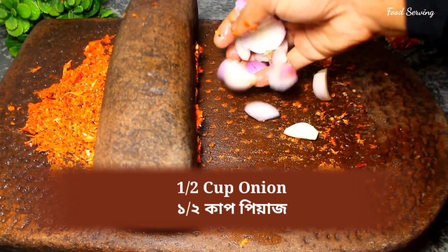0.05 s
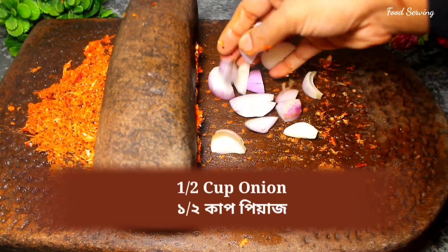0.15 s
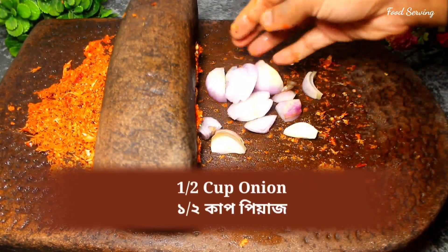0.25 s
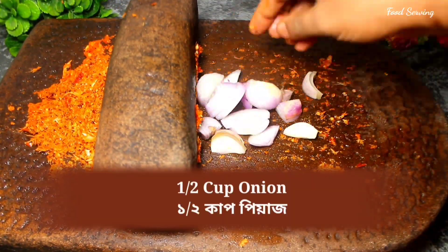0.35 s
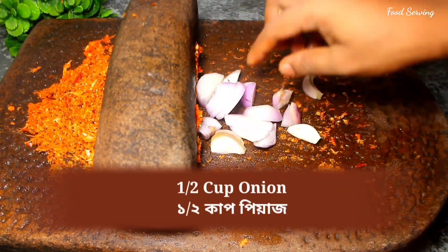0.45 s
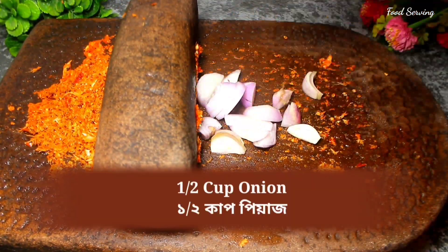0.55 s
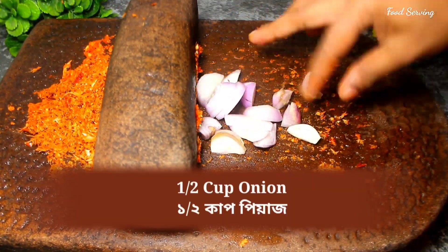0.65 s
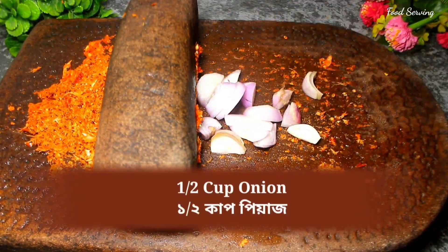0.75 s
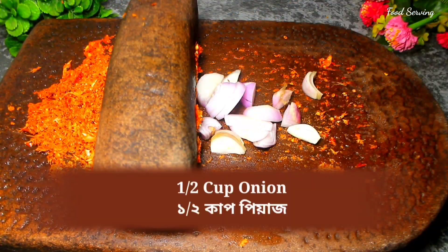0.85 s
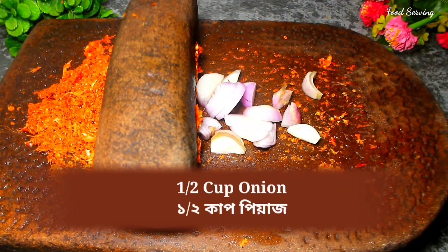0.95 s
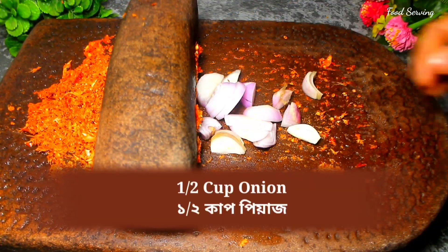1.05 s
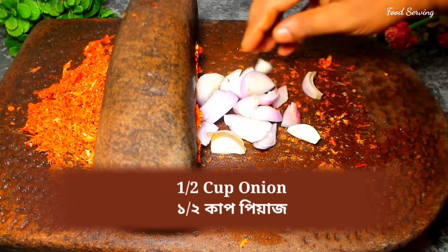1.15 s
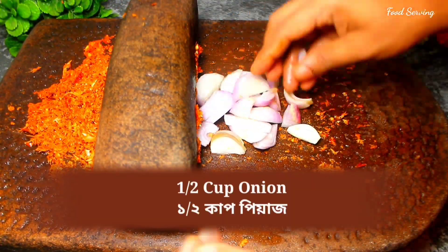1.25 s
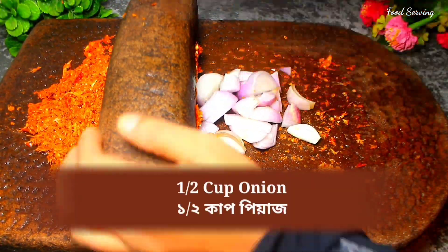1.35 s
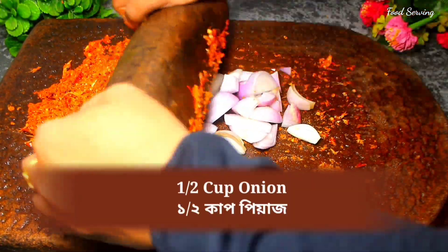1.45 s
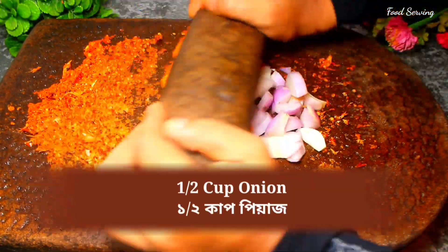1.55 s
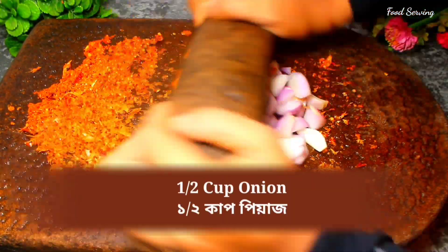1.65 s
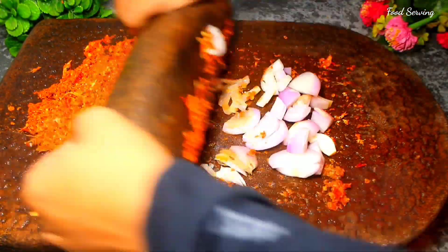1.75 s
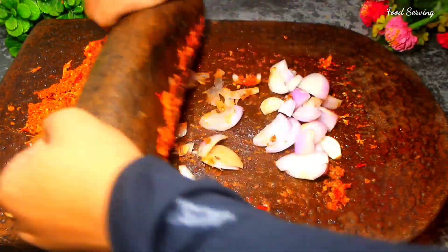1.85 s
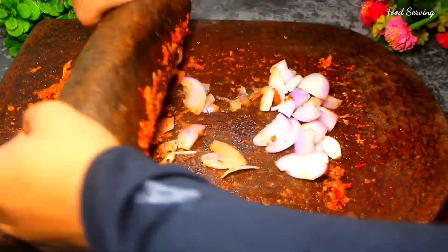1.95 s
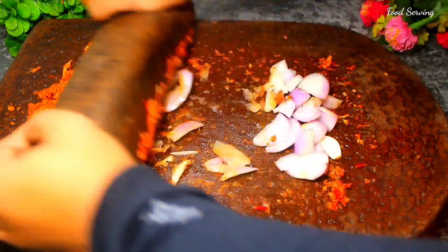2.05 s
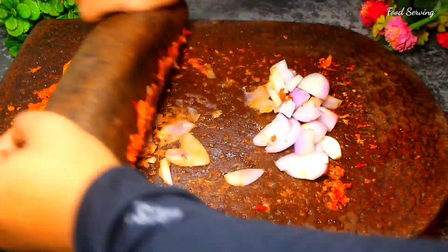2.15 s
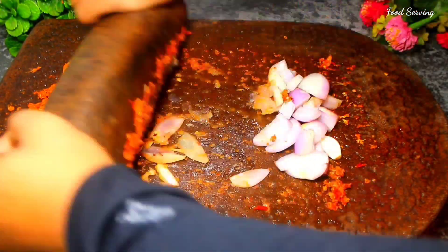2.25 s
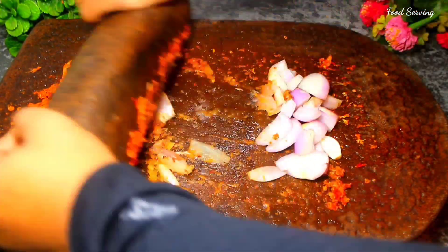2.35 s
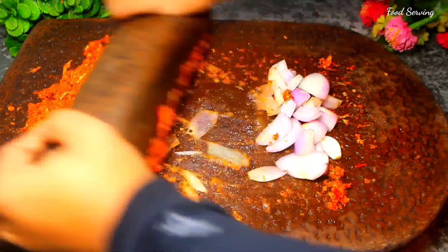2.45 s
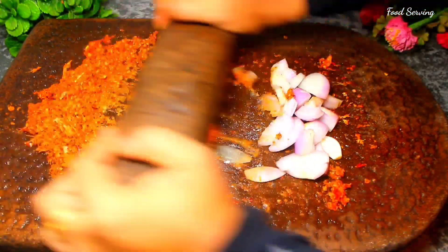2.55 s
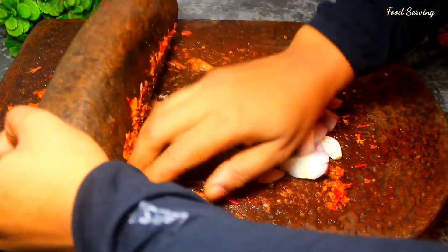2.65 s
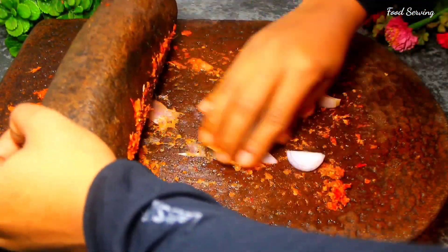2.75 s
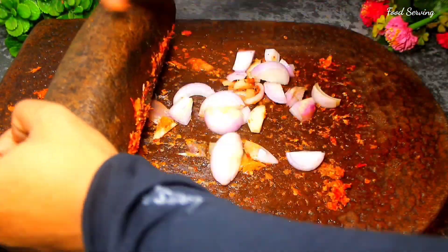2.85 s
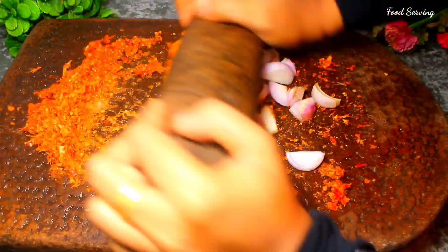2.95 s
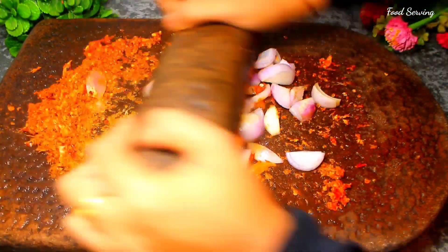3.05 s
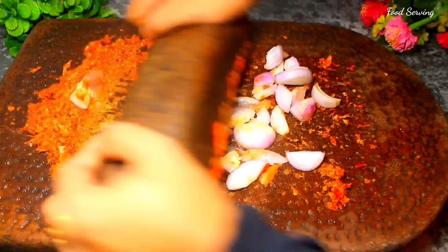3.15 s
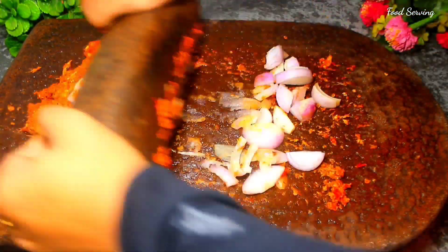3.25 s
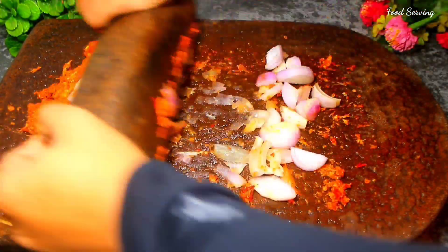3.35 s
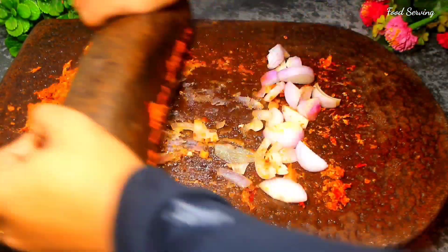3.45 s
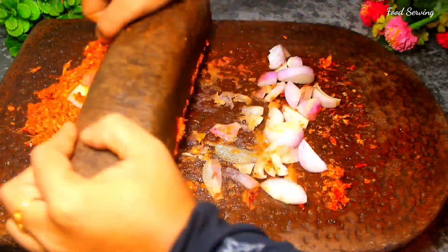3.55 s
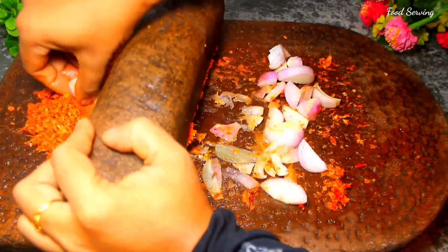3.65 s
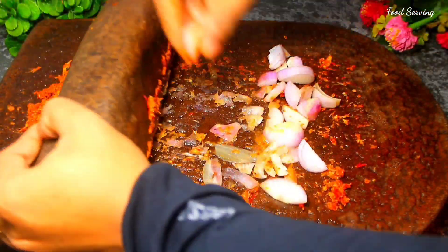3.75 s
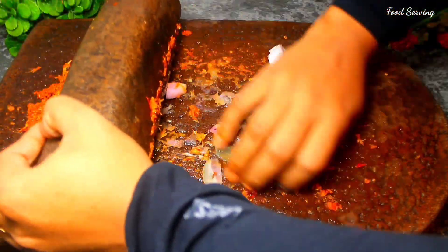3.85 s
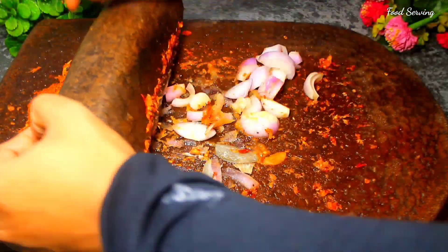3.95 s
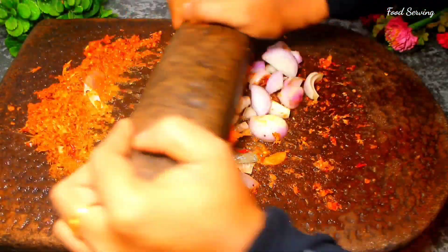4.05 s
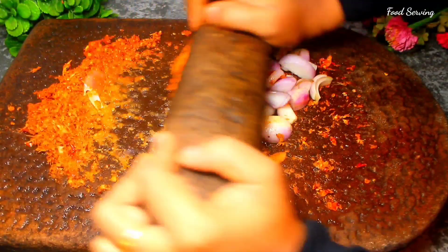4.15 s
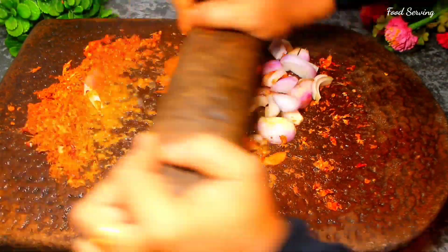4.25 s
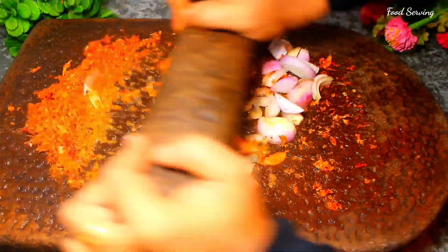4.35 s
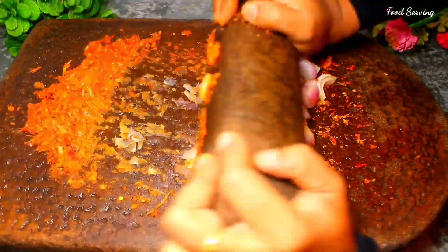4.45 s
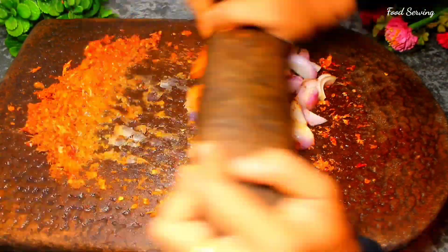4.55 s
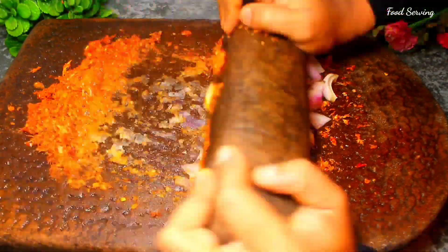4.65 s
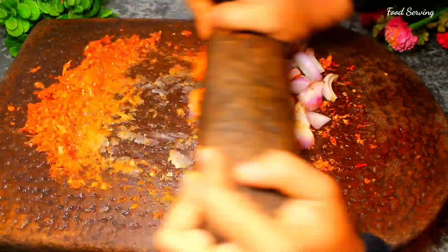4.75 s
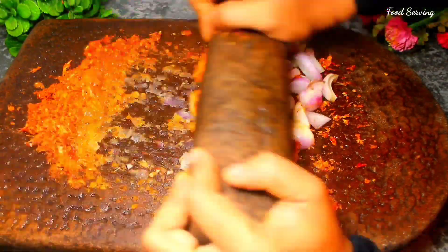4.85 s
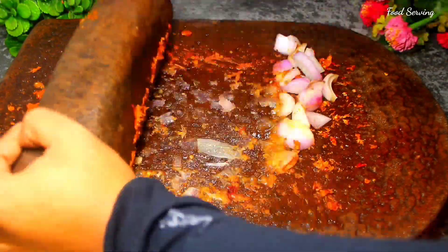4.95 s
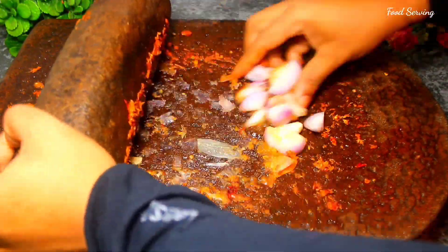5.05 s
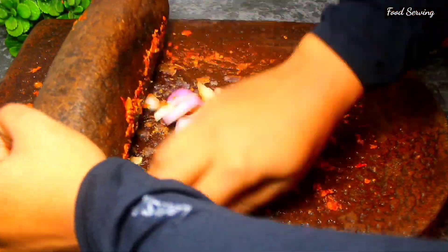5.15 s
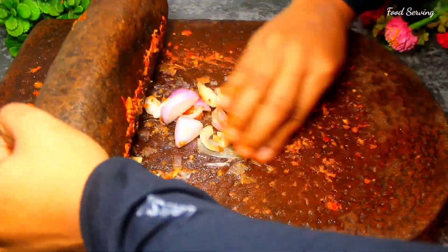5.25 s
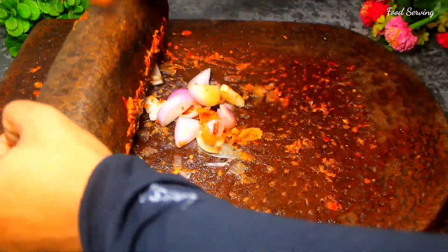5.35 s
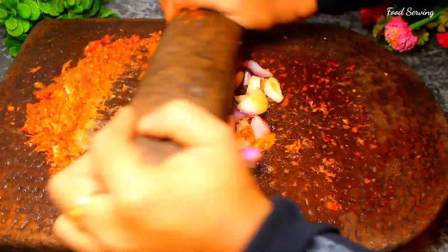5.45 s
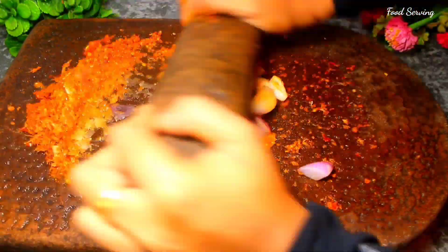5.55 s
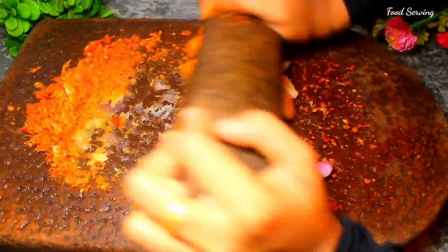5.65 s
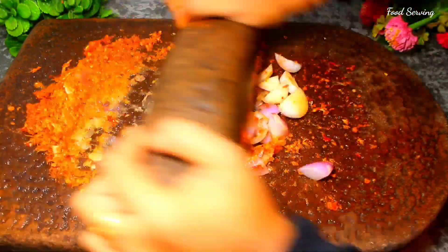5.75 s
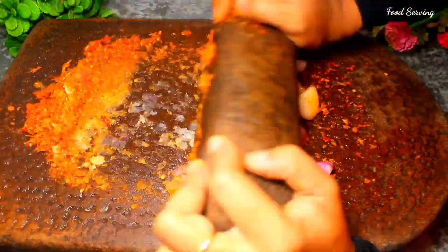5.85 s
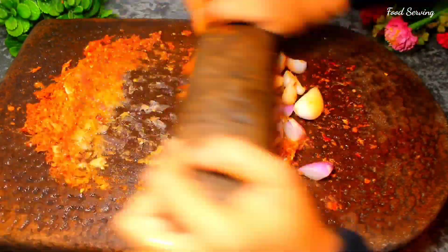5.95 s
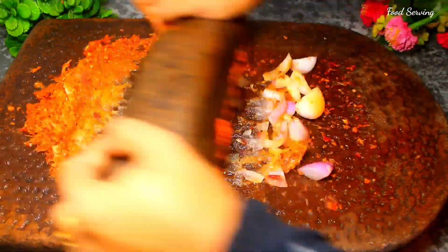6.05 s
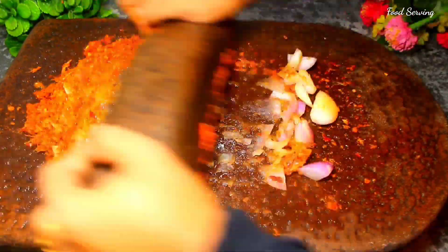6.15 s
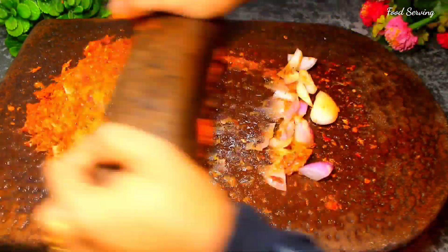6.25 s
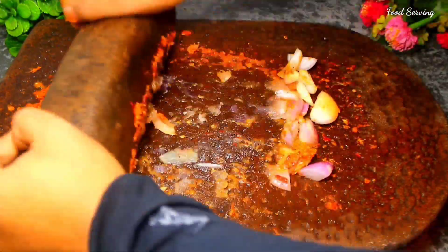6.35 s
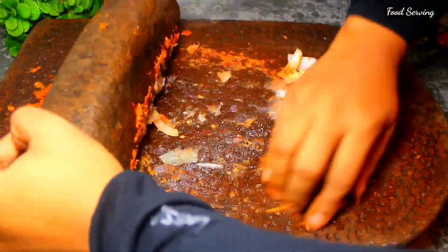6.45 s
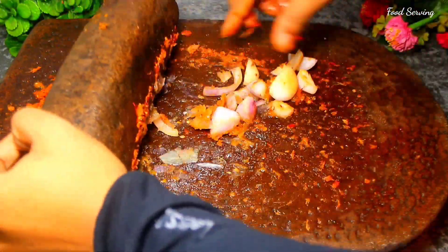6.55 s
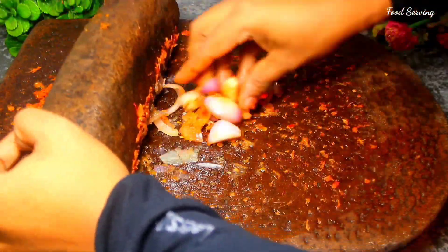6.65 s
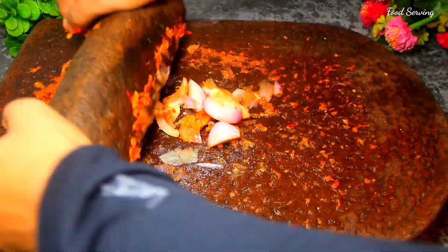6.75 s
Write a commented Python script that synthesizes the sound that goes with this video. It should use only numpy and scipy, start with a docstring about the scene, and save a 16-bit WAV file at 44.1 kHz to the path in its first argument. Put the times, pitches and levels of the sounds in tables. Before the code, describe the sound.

For the first 1.5 seconds it is quiet: faint drifting air and a weak low motor hum, soft finger rustles, tiny wet ticks, a small stone tap at 0.2 and faint breathy high chirps near 0.1 and 0.75. At about 1.56 a stone roller starts with irregular knocks and bright onion cracks, a solid clack near 1.93, then settles into rapid gritty to-and-fro scraping with low crunches until 2.7. A pause brings a rustle and wet ticks. Grinding resumes from 3.03 to 3.7, with a very hard clack at 3.09. After a quiet gap, a steadier bout runs 4.1 to 5.08 with crisp snaps. Fingers rustle softly, then the last bout, 5.5 to 6.5, opens with loud knocks at 5.54, 5.7 and 5.8 and has faint thin squeals around 6.2. It ends in a rustle and quiet air. Close, lightly roomy, little bass.

```python
"""A room with a stone slab, on which a stone roller is rubbed fast to and fro, crushing onion into spice paste in four bouts.
Grit pulses, louder with stroke speed, hiss and ring the stone modes; blows ring them too, as the roller knocks on the slab.
Onion pieces crack and lumps crunch as short bursts of ring and noise; wet ticks and rustling fingers fill the pauses.
Drifting air noise, motor hum tones, high noise-band chirps and faint wavering squeals complete it.
One close microphone flattens the hardest knocks."""
import sys
import numpy as np
from scipy import signal
from scipy.fft import rfft, irfft
from scipy.io import wavfile
from scipy.ndimage import uniform_filter1d

SR = 44100
rng = np.random.default_rng(int(sys.argv[2]) if len(sys.argv) > 2 else 0)


def master(y):
    """Save y as 16-bit WAV."""
    cut = np.clip(np.atleast_2d(y).T, -1, 1)
    pcm = np.round(cut * 32767)  # scale
    wavfile.write(sys.argv[1], SR, pcm.astype(np.int16))


N = 299880


def undb(db):
    """Amplitude of a level in dB."""
    return 10 ** (np.asarray(db) / 20)


def unit(x):
    """Scale to rms 1."""
    return x / np.sqrt(np.mean(x ** 2))


def log_bins():
    """Log frequency of each FFT bin; 1 Hz added to keep the log finite."""
    return np.log(np.arange(N // 2 + 1) * SR / N + 1)


def colour(x, points):
    """Shape by a (f/Hz, gain/dB) spectrum; rms 1."""
    hz, db = np.transpose(points)
    gain = undb(np.interp(log_bins(), np.log(hz), db))
    return unit(irfft(rfft(x) * gain, N))


def walk(rate_hz):
    """Random levels held 1 / rate_hz s and slewed twice; spread near 1."""
    k = int(SR / rate_hz)
    held = np.repeat(rng.standard_normal(N // k + 1), k)
    return 1.6 * uniform_filter1d(uniform_filter1d(held, k), k)[:N]


def patchy(x, centres_hz, rate_hz, depth_db):
    """Each band swells and fades alone; rms 1."""
    f, spectrum = log_bins(), rfft(x)
    out = np.zeros(N)
    for row in np.eye(len(centres_hz)):
        share = np.interp(f, np.log(centres_hz), row)
        out += irfft(spectrum * share, N) * undb(depth_db * walk(rate_hz))
    return unit(out)


def thin(x, hz):
    """High-pass: a small body radiates little below this frequency."""
    return signal.sosfilt(signal.butter(2, hz, "high", fs=SR, output="sos"), x)


def mode(x, hz, t60_s):
    """One ringing mode; a unit pulse rings with peak near 1."""
    pole = np.exp(2j * np.pi * hz / SR - np.log(1000) / (t60_s * SR))
    return signal.lfilter([1], [1, -pole], x).imag


def grit(rate_hz, spread_db, patchy_db):
    """Grains that catch and let go: random pulses of very uneven size, in patches, over fine dust."""
    caught = rng.random(N) < rate_hz / SR
    size = undb(spread_db * np.minimum(rng.exponential(size=N), 3.0))
    grains = caught * size * rng.standard_normal(N)
    dust = 0.37 * rng.standard_normal(N)
    return unit((grains + dust) * undb(patchy_db * walk(250)))


# room air spectrum: f/Hz, relative level/dB
AIR_SPECTRUM = [(20, -40), (60, -24.5), (145, -25), (175, -17), (230, -22.5), (420, -15.5), (1190, -13.5),
                (1760, -18.5), (2120, -17.5), (4000, -22.5), (7470, -27.5), (14000, -28), (16000, -31.5)]
AIR_RMS_DB = -61
AIR_DIP_S, AIR_DIP_FALL_S, AIR_DIP_RISE_S, AIR_DIP_DB = .98, .08, .05, -6


def room_air():
    """Noise whose bands drift; the level dips briefly."""
    t = np.arange(N) / SR
    air = patchy(colour(rng.standard_normal(N), AIR_SPECTRUM), [100, 400, 1200, 2500, 6000, 12000], 16, 1.0)
    dip_at_s = [AIR_DIP_S - AIR_DIP_FALL_S, AIR_DIP_S, AIR_DIP_S + AIR_DIP_RISE_S]
    return air * undb(AIR_RMS_DB + np.interp(t, dip_at_s, [0, AIR_DIP_DB, 0]))


# motor tones, the two upper ones beating: f/Hz, rms level before the wander/dB
MOTOR_TONES = [(178.2, -86), (350.33, -75), (356.45, -66)]
HUM_CREST_S = .05  # all tones crest together here


def motor_hum():
    """Steady tones under one wandering level."""
    t = np.arange(N) / SR
    hum = np.zeros(N)
    for hz, rms_db in MOTOR_TONES:
        hum += np.sqrt(2) * undb(rms_db) * np.cos(2 * np.pi * hz * (t - HUM_CREST_S))
    return hum * undb(1.4 * walk(8))


# high chirps: start t/s, length/s, f/Hz, upper band's level before the fade/dB
CHIRP_EVENTS = [(0.086, 0.13, 12000, -59), (0.752, 0.075, 12200, -51.5), (5.38, .05, 11500, -56)]
CHIRP_ATTACK_S, CHIRP_FADE_DB, CHIRP_HALF_PITCH_DB = .01, -24, -12
CHIRP_T60_S = .004  # short ring: a band some hundred Hz wide


def chirps():
    """Rough, breathy noise bands with a weak band an octave below: quick onset, steady fade."""
    out, t = np.zeros(N), np.arange(N) / SR
    noise = rng.standard_normal(N)

    def band(hz):
        """Noise through two equal modes; rms 1."""
        return unit(mode(mode(noise, hz, CHIRP_T60_S), hz, CHIRP_T60_S))

    for s, length_s, hz, db in CHIRP_EVENTS:
        fade_db = CHIRP_FADE_DB * np.clip((t - s) / length_s, 0, 1)
        gain = np.clip((t - s) / CHIRP_ATTACK_S, 0, 1) * (t < s + length_s) * undb(db + fade_db)
        out += gain * (band(hz) + undb(CHIRP_HALF_PITCH_DB) * band(hz / 2))
    return out


# fingers among the pieces: start t/s, length/s, level at mid-swell/dB
RUSTLE_EVENTS = [(.17, 0.13, -64), (.46, .22, -61), (0.744, 0.083, -67), (1.2, 0.27, -68.5),
                 (2.74, 0.095, -60.5), (3.688, 0.055, -64), (5.07, .2, -66), (6.488, 0.11, -59)]
# rustle spectrum: f/Hz, relative level/dB
RUSTLE_SPECTRUM = [(400, -15), (1200, 2.5), (2500, -2), (6000, -10.5), (15000, -16)]


def rustles():
    """Sparse damp grains while fingers move the pieces about."""
    t = np.arange(N) / SR
    gain = np.zeros(N)
    for s, length_s, db in RUSTLE_EVENTS:
        gain += undb(db) * np.sin(np.pi * np.clip((t - s) / length_s, 0, 1))
    return gain * patchy(colour(grit(150, 5.5, 4.6), RUSTLE_SPECTRUM), [900, 1400, 2500, 6000], 30, 3.0)


def snaps(events, t60_s, width, noisy):
    """Short decaying bursts, part ring and part noise around the pitch."""
    out, t = np.zeros(N), np.arange(4000) / SR
    for s, db, hz in events:
        noise = unit(mode(rng.standard_normal(len(t)), hz, 2.8 / (width * hz)))
        burst = noisy * noise + (1 - noisy) * np.sin(2 * np.pi * hz * t)
        i = int(s * SR)
        out[i:i + len(t)] += undb(db) * burst * np.exp(-np.log(1000) * t / t60_s)
    return out


# paste and fingers: t/s, level/dB, f/Hz
TICK_EVENTS = [(0.287, -49, 1100), (0.486, -53, 1080), (0.559, -50, 1300), (0.619, -50.5, 1280),
               (0.789, -53, 1230), (2.769, -38, 1354), (2.796, -48, 4400), (2.796, -41.5, 1290),
               (5.079, -53, 840)]


def wet_ticks():
    """Ticks of paste and fingers: broad, damped bursts."""
    return snaps(TICK_EVENTS, t60_s=0.045, width=0.25, noisy=0.45)


# lumps giving way: t/s, level/dB, f/Hz
CRUNCH_EVENTS = [(1.722, -44, 353), (1.862, -42.5, 570), (1.964, -43, 370), (1.976, -34.5, 640),
                 (2.014, -39.5, 660), (2.087, -39.5, 357), (2.144, -42, 347), (2.225, -41.5, 667),
                 (2.492, -41.5, 343), (2.593, -42, 650), (2.633, -48, 657), (3.132, -41, 710),
                 (3.249, -39.5, 365), (6.353, -44, 344)]


def crunches():
    """Low bursts, mostly ring, as lumps give way."""
    return snaps(CRUNCH_EVENTS, t60_s=0.048, width=0.37, noisy=0.28)


# pieces cracking under roller or fingers: t/s, level/dB, f/Hz
CRACK_EVENTS = [(0.273, -40, 11200), (0.399, -47, 4870), (0.694, -50, 3500), (1.074, -42.5, 6350),
                (1.6375, -22, 14400), (1.6527, -39, 13600), (1.6623, -32, 10700), (1.674, -33, 14900),
                (1.692, -26.5, 8700), (1.834, -19, 12070), (2.105, -40, 7600), (2.1306, -31.5, 4480),
                (2.482, -33, 12800), (2.5805, -28, 13000), (3.1212, -31, 5600), (4.1602, -36, 9000),
                (4.1979, -29, 11300), (4.301, -36, 10600), (4.3155, -29, 12400), (4.587, -29.5, 11000),
                (5.019, -38, 12600), (5.082, -46, 6500), (5.09, -48, 9500), (5.136, -48, 5500),
                (5.236, -47, 2500), (5.9244, -28.5, 11400)]


def onion_cracks():
    """Very short bursts, mostly noise, as pieces break."""
    return snaps(CRACK_EVENTS, t60_s=0.01, width=0.14, noisy=0.63)


# faint stone squeals: start t/s, length/s, f/Hz, mid-swell level before break-up/dB
SQUEAL_EVENTS = [(1.5, .045, 3770, -65), (5.27, .08, 1250, -63), (6.12, .065, 4130, -61),
                 (6.15, .17, 3410, -57), (6.23, .065, 4030, -60)]


def squeals():
    """Thin tones that swell, break up and waver in pitch."""
    out, t = np.zeros(N), np.arange(N) / SR
    for s, length_s, hz, db in SQUEAL_EVENTS:
        swell = np.sin(np.pi * np.clip((t - s) / length_s, 0, 1))
        gain = swell * undb(db + 2.8 * walk(70))
        wavering_hz = hz * (1 + 0.009 * walk(350))
        out += gain * np.sin(2 * np.pi * np.cumsum(wavering_hz) / SR)
    return out


# stone on stone: t/s, blow level/dB, slab ring re blow/dB, crack re blow/dB
KNOCK_EVENTS = [(0.196, -47, -13, -12), (0.209, -43, -1, -4.5), (1.5682, -28.5, -11, -37),
                (1.5734, -25, -17, -35), (1.5999, -29, -24, -17), (1.7684, -23, -18, -25),
                (1.7731, -22.5, -23, -28), (1.7781, -29.5, -11, -38), (1.7846, -23, -3, -30),
                (1.9011, -41.5, 13, -17), (1.935, -18.5, -9, -22), (2.2469, -36, 3, -21),
                (2.363, -38.5, -5, -14), (3.052, -31.5, 1.5, -20), (3.0886, -9.5, -12.5, -2.5),
                (3.2016, -31.5, 8.5, -22), (3.2054, -34, 11.5, -26), (3.22, -23, -19, -30),
                (3.3223, -30, 1, -22), (3.4269, -34.5, -9, -18), (4.2597, -33.5, 5.5, -23),
                (4.2802, -37, 15.5, -16), (4.38, -45, 16.5, -10), (4.5046, -41, -19, -7),
                (4.8167, -38, 2, -11), (5.5442, -16.5, -5, -44), (5.5883, -24.5, 0, -14),
                (5.6979, -11.5, -14.5, -0.5), (5.7988, -8.5, -16.5, -24), (6.1263, -38, -14, -12),
                (6.317, -32.5, 2, -9)]
# stone modes, also rubbed by the grit: f/Hz, t60 when rubbed/ms, level/dB
SLAB_MODES = [(355, 91, -11.5), (687, 114, -12.5), (870, 120, -9.5), (961.2, 118, -1.5), (996, 163, -2.5),
              (1083, 100, -6.5), (1323, 40, -4)]
ROLLER_MODES = [(1995, 51, -4.5), (2300, 30, -4.5), (2440, 35, -3), (2656, 27, 0.5), (2745, 24, -7.5),
                (2930, 30, -2), (3930, 17, -13.5), (4350, 29, -12), (4740, 13, -49), (5530, 72, -12),
                (5730, 68, -7.5), (6760, 27, -24)]
# broad, quick resonances of the contact patch, blows only: f/Hz, t60 before BLOW_T60_RATIO/ms, level/dB
CONTACT_MODES = [(2864, 12.3, 1), (3770, 4.3, -13), (4654, 10.3, -5), (5300, 6.3, -15.5)]
# crack noise spectrum: f/Hz, relative level/dB
CRACK_SPECTRUM = [(1200, -10), (2500, 6), (5000, 20), (7500, 1), (12000, -3), (16000, -27)]
BLOW_T60_RATIO = 0.6  # modes ring shorter in a blow
CONTACT_PER_DB, CONTACT_REF_DB = 0.32, -19.5  # contact gain in dB per dB of blow above the reference
KNOCK_HARD_DB = -9  # a full-strength blow
DULL_DB_PER_OCTAVE = .12  # treble lost per octave above 3 kHz for each dB that a blow is softer


def knocks():
    """Each blow meets the stone elsewhere, so every mode gets a new share; broad modes speak loudest."""
    s, db, slab_db, crack_db = np.transpose(KNOCK_EVENTS)
    at = (s * SR).astype(int)
    roller, slab = np.zeros(N), np.zeros(N)
    modes = SLAB_MODES + ROLLER_MODES + CONTACT_MODES
    chance = rng.standard_normal((len(s), len(modes)))
    for k, (hz, ms, mode_db) in enumerate(modes):
        on_slab = k < len(SLAB_MODES)
        level_db = db + mode_db + 2.68 * chance[:, k]
        level_db += DULL_DB_PER_OCTAVE * np.log2(max(hz / 3000, 1)) * (db - KNOCK_HARD_DB)
        if on_slab:
            level_db += slab_db
        if k >= len(SLAB_MODES + ROLLER_MODES):
            level_db += CONTACT_PER_DB * (db - CONTACT_REF_DB)
        blow = np.zeros(N)
        blow[at] = np.sign(chance[:, k]) * undb(level_db)
        body = slab if on_slab else roller
        body += (ms / 8) ** -.6 * mode(blow, hz, BLOW_T60_RATIO * ms / 1000)
    decay = np.zeros(N)
    decay[at] = undb(db + crack_db)
    decay = signal.lfilter([1], [1, -np.exp(-1 / (0.0013 * SR))], decay)  # 1.3 ms time constant
    crack = decay * colour(rng.standard_normal(N), CRACK_SPECTRUM)
    return thin(roller, 910) + thin(slab, 380) + crack


# half strokes by bout: start t/s, direction, grit hiss level/dB, stone ring level/dB; each lasts to the next turn
STROKES = [
    [(1.562, "push", -72, -43.5), (1.62, "pull", -51, -58), (1.67, "push", -48, -55),
     (1.735, "pull", -70, -59), (1.765, "push", -60, -46.5), (1.79, "pull", -46.5, -47.5),
     (1.823, "push", -49, -52), (1.86, "pull", -67, -62), (1.899, "push", -51.5, -46.5),
     (1.931, "pull", -45.5, -46.5), (1.976, "push", -66, -57), (2.0, "pull", -55, -55.5),
     (2.053, "push", -46, -55.5), (2.115, "pull", -49, -56.5), (2.154, "push", -44, -56.5),
     (2.207, "pull", -50.5, -57), (2.261, "push", -46.5, -52), (2.307, "pull", -53, -55.5),
     (2.365, "push", -44.5, -52.5), (2.412, "pull", -49, -54.5), (2.47, "push", -46.5, -50),
     (2.517, "pull", -52, -51.5), (2.571, "push", -48, -52), (2.619, "pull", -52.5, -57.5),
     (2.672, "push", -50, -54)],
    [(3.03, "pull", -48.5, -52.5), (3.108, "push", -51.5, -54), (3.193, "pull", -43, -39.5),
     (3.255, "push", -62, -62), (3.282, "pull", -50, -55), (3.325, "push", -44.5, -50.5),
     (3.384, "pull", -49, -56.5), (3.441, "push", -45.5, -51.5), (3.488, "pull", -53, -57),
     (3.549, "push", -45, -50.5), (3.595, "pull", -50, -59.5), (3.649, "push", -47, -56.5)],
    [(4.105, "push", -66, -61), (4.154, "pull", -47, -68), (4.19, "push", -43, -54),
     (4.24, "pull", -63, -57), (4.273, "push", -44, -53), (4.348, "pull", -48, -61),
     (4.396, "push", -44, -57), (4.458, "pull", -45.5, -56), (4.494, "push", -43, -56),
     (4.558, "pull", -48.5, -54), (4.603, "push", -47, -51.5), (4.658, "pull", -51, -57.5),
     (4.706, "push", -48, -50), (4.758, "pull", -51.5, -54.5), (4.81, "push", -47.5, -48.5),
     (4.856, "pull", -47.5, -58), (4.913, "push", -47.5, -53), (4.969, "pull", -47, -55),
     (5.011, "push", -50, -55.5)],
    [(5.51, "pull", -58, -65), (5.575, "pull", -49, -46.5), (5.607, "push", -39, -50),
     (5.64, "pull", -61, -57), (5.711, "push", -42.5, -52), (5.755, "pull", -52.5, -56),
     (5.811, "push", -42, -58), (5.868, "pull", -48, -56.5), (5.917, "push", -44.5, -57.5),
     (5.976, "pull", -45.5, -54), (6.012, "push", -44, -51.5), (6.076, "pull", -48, -58.5),
     (6.121, "push", -42.5, -56.5), (6.181, "pull", -46, -52.5), (6.229, "push", -45, -51.5),
     (6.285, "pull", -48.5, -51), (6.334, "push", -46, -48.5), (6.389, "pull", -49, -54.5),
     (6.435, "push", -47, -51)],
]
# end of each bout: t/s
STROKES_END_S = [2.735, 3.697, 5.077, 6.499]
# paste under the roller by bout: t/s, rumble level/dB, slab ring re roller ring/dB
PASTE_STATE = [
    [(1.56, -82, -16), (1.66, -72, -2), (1.73, -46.5, 1), (1.8, -76, 2.5), (1.87, -53, 9), (1.93, -62, -5),
     (1.985, -52, -1), (2.03, -58.5, 4.5), (2.1, -54.5, 4), (2.3, -56.5, -1), (2.5, -52.5, 1.5),
     (2.74, -55, -1)],
    [(3.02, -68, -13), (3.13, -60, 9.5), (3.22, -65, -3.5), (3.265, -43.5, 3), (3.31, -59.5, 2.5),
     (3.62, -54.5, 2.5), (3.7, -58, -7)],
    [(4.15, -62, -2), (4.26, -61, 4), (4.36, -59, 5.5), (4.42, -56.5, 0.5), (4.55, -57.5, -2.5),
     (4.72, -56.5, -1), (4.9, -56, 1), (5.08, -58.5, 2.5)],
    [(5.51, -75, -6), (5.62, -60, 3), (5.8, -66, 6), (5.93, -56.5, 2), (6.02, -60, -7.5), (6.1, -55.5, 6.5),
     (6.3, -59.5, -1.5), (6.48, -58.5, 3.5), (6.53, -62, 8)],
]
# push is fastest early, pull late: fastest point/0-1, cut before the turn/ms, slab re roller/dB, slowing exponent
STROKE_SHAPE = {"push": (.3, 6, 2.5, 2.2), "pull": (.6, 4.6, 0.39, 1.1)}
LONGEST_STROKE_MS = 62.7  # before the overlap
OVERLAP_SAMPLES, LEAD_SAMPLES = 300, 130


def stroke_gains(sharp):
    """Speed swells and dies within each half stroke; raised to four powers it gives hiss, roller, slab, rumble gains."""
    power = np.zeros((4, N))
    for strokes, end_s, paste in zip(STROKES, STROKES_END_S, PASTE_STATE):
        at, rumble_db, slab_db = np.transpose(paste)
        turns_s = [row[0] for row in strokes[1:]] + [end_s]
        for (s, way, hiss_db, ring_db), turn_s in zip(strokes, turns_s):
            top, cut_ms, press_db, slowing = STROKE_SHAPE[way]
            ms = min(1000 * (turn_s - s) - cut_ms, LONGEST_STROKE_MS)
            u = np.linspace(0, 1, int(ms * SR / 1000) + OVERLAP_SAMPLES)
            rise_fall = np.sin(np.pi / 2 * np.minimum(u / top, (1 - u) / (1 - top)))
            speed = rise_fall ** np.where(u > top, slowing, 1)
            i = int(s * SR) - LEAD_SAMPLES
            t = (i + np.arange(len(u))) / SR
            slab_ring_db = ring_db + press_db + np.interp(t, at, slab_db)
            levels_db = hiss_db, ring_db, slab_ring_db, np.interp(t, at, rumble_db)
            for row, (db, p) in enumerate(zip(levels_db, sharp)):
                power[row, i:i + len(u)] += (undb(db) * unit(speed ** p)) ** 2
    return np.sqrt(power)


def rub(drive, modes):
    """Grit drives every mode; sharp modes are weighted to their tabled power."""
    out = np.zeros(N)
    for hz, ms, db in modes:
        out += undb(db) * mode(drive, hz, ms / 1000) * np.sqrt(4000 / (ms * SR))
    return out


# grit hiss and paste rumble spectra: f/Hz, relative level/dB
HISS_SPECTRUM = [(1760, -33), (3000, -4), (3680, -15.5), (5670, -8.5), (7350, -9.5), (13200, 0),
                 (16000, -4)]
RUMBLE_SPECTRUM = [(100, -30), (190, -31), (270, 5), (420, -1), (650, 3), (900, 2), (1700, -7), (3500, -14)]


def grinding():
    """Hiss of the grit, ring of roller and slab, crunching rumble through the paste."""
    hiss, roller, slab, rumble = stroke_gains([1.0, 0.65, 0.32, 0.34])
    hiss_noise = colour(grit(2000, 3.06, 2.4), HISS_SPECTRUM)
    hissing = hiss * patchy(hiss_noise, [4000, 6600, 9100, 11200, 14100], 90, 2.7)
    roller_ring = thin(rub(roller * grit(1200, 2.8, 2.03), ROLLER_MODES), 1240)
    slab_ring = rub(slab * grit(600, 2.74, 2.65), SLAB_MODES)
    crunch = patchy(colour(grit(300, 2.9, 1.45), RUMBLE_SPECTRUM), [243, 394, 620, 900, 1400], 45, 2.4)
    return hissing + roller_ring + slab_ring + uniform_filter1d(rumble, 600) * crunch


ROOM_T60_S, ROOM_DB = 0.13, -16.5


def room(near):
    """Decaying noise tail of unit energy, starting after 4 ms."""
    t = np.arange(int(.3 * SR)) / SR
    tail = (t > .004) * rng.standard_normal(len(t)) * np.exp(-np.log(1000) * t / ROOM_T60_S)
    return undb(ROOM_DB) * signal.fftconvolve(near, tail / np.sqrt(np.sum(tail ** 2)))[:N]


BASS_CUT_HZ = 170


def scene():
    """Near sounds, bass cut twice, with their room tail; chirps, air and hum stay dry."""
    far = room_air() + motor_hum() + chirps()
    near = rustles() + wet_ticks() + crunches() + onion_cracks() + squeals() + knocks() + grinding()
    near = thin(thin(near, BASS_CUT_HZ), BASS_CUT_HZ)
    return (near + room(near) + far)[None]


CEILING_DB, TOP_HZ = -14, 15500


def record(dry):
    """The hardest knocks flatten against a soft ceiling; the top is cut."""
    ceiling = undb(CEILING_DB)
    held = dry / (1 + (dry / ceiling) ** 8) ** .125
    return signal.sosfilt(signal.ellip(8, .2, 60, TOP_HZ, fs=SR, output="sos"), held)


dry = scene()
out = record(dry)
master(out)
```